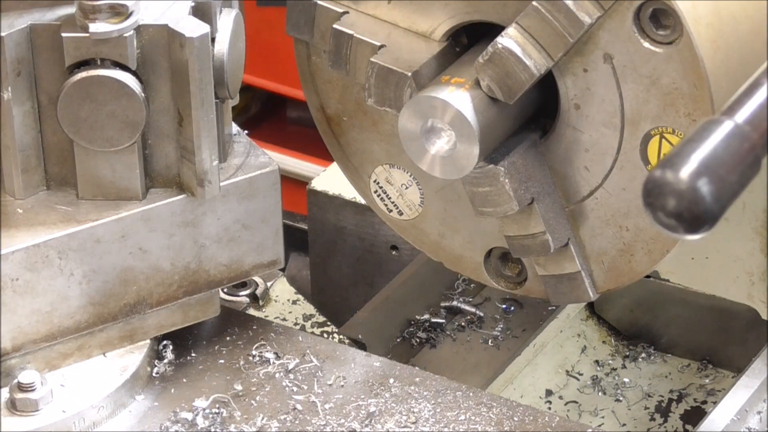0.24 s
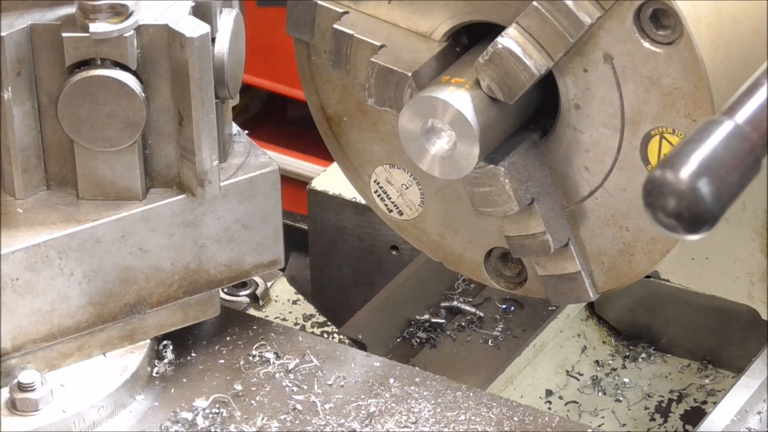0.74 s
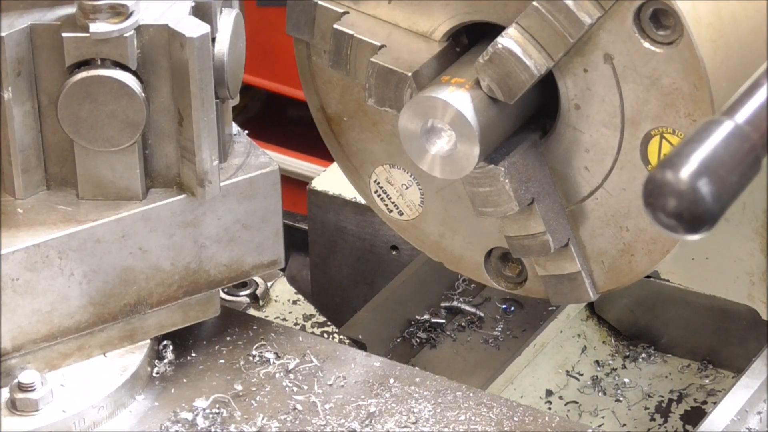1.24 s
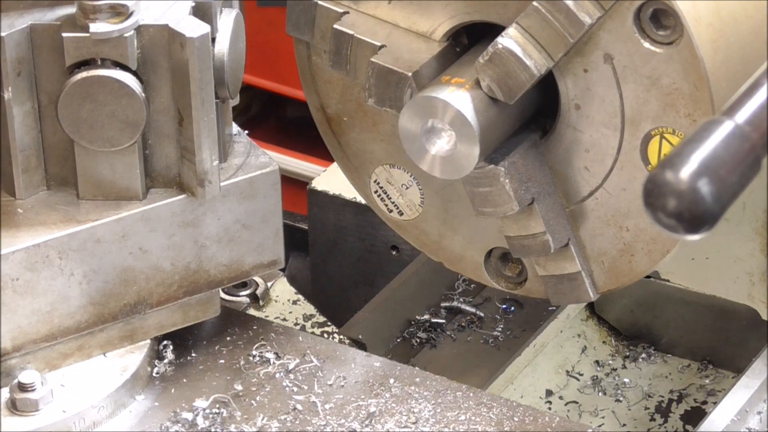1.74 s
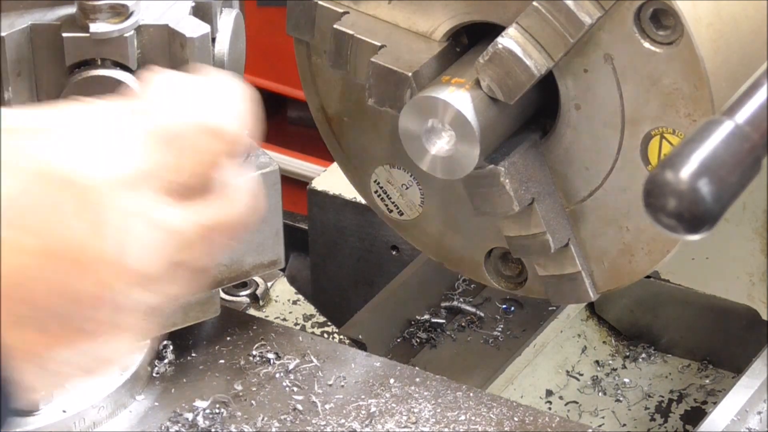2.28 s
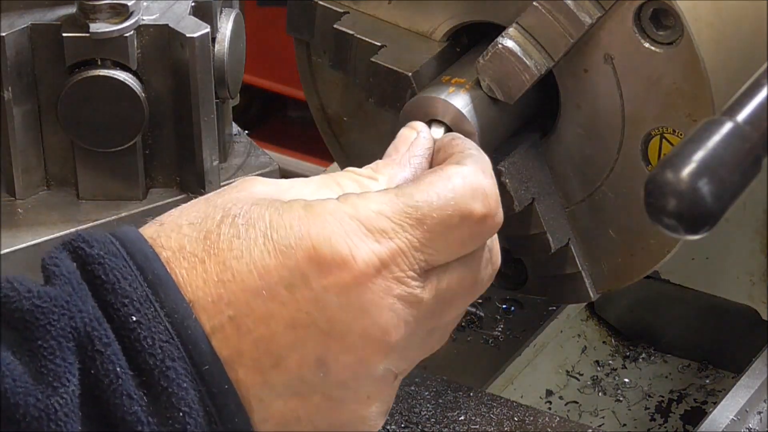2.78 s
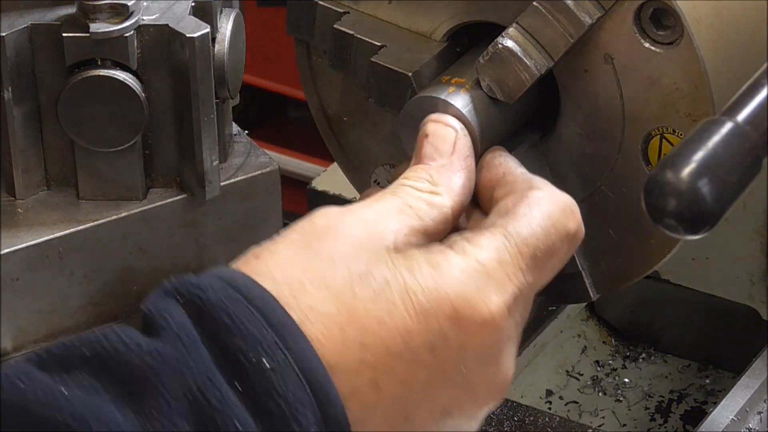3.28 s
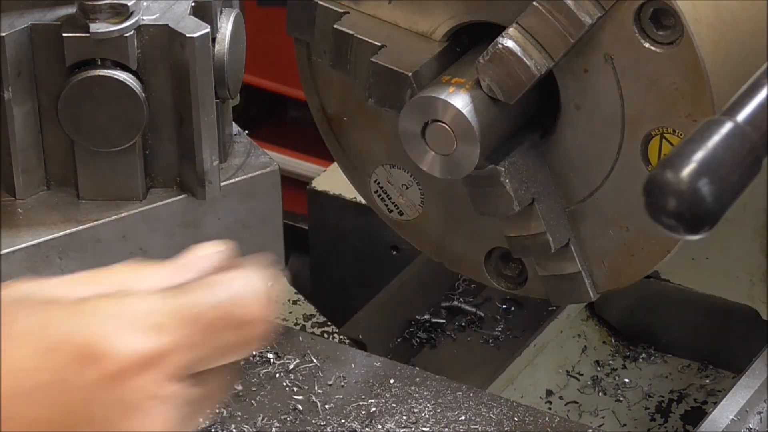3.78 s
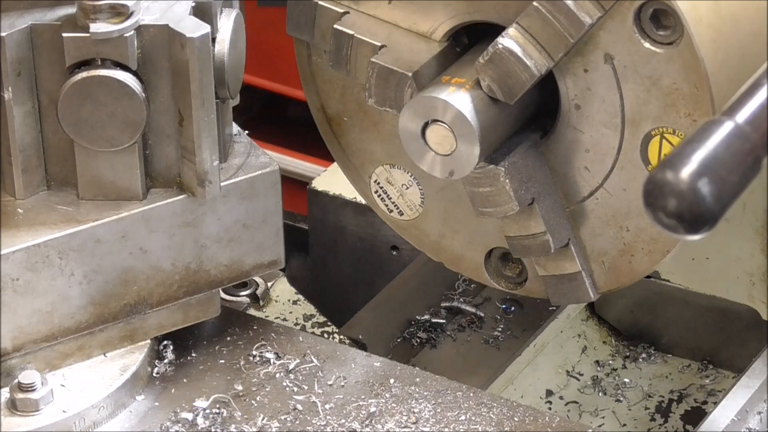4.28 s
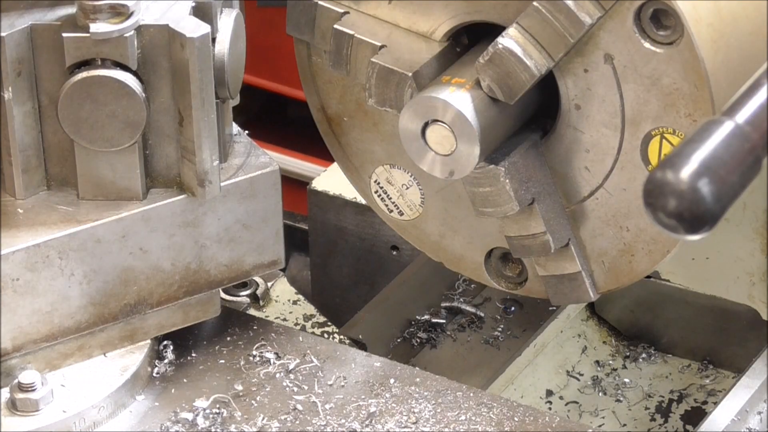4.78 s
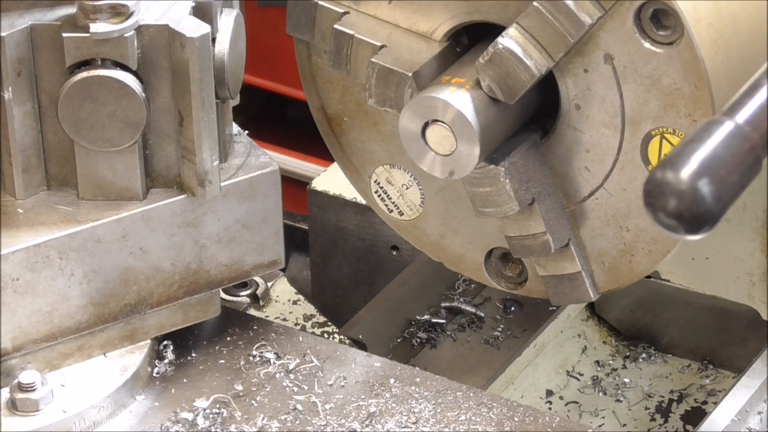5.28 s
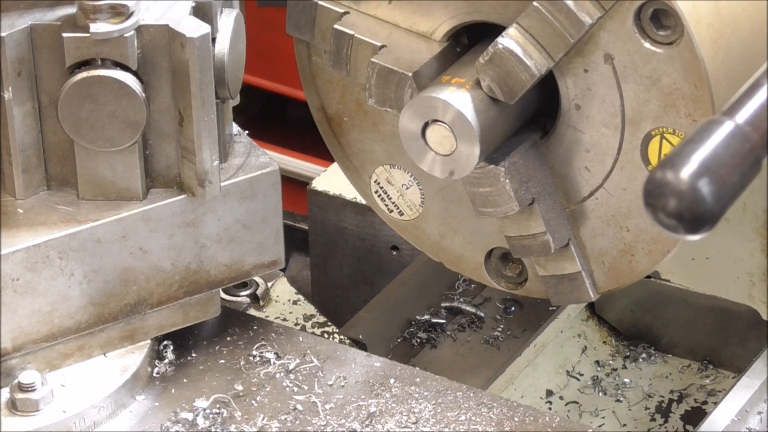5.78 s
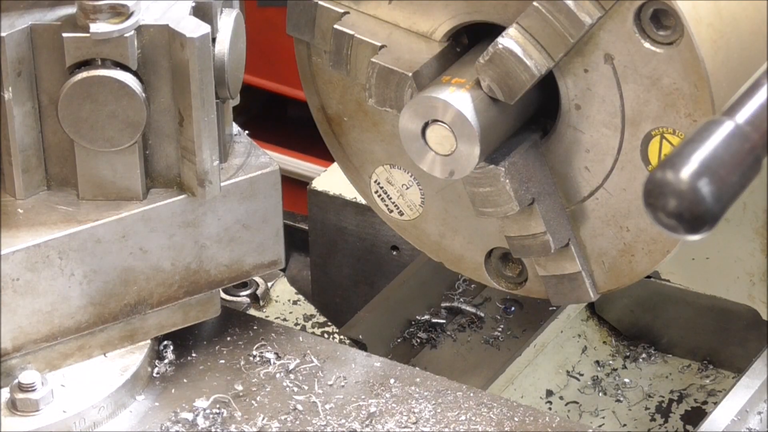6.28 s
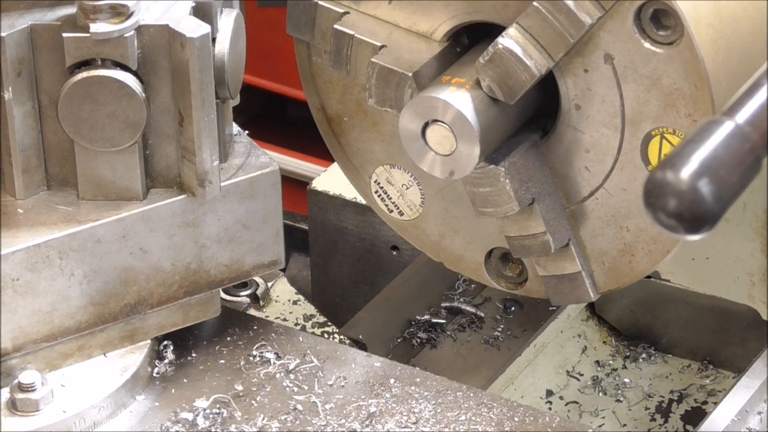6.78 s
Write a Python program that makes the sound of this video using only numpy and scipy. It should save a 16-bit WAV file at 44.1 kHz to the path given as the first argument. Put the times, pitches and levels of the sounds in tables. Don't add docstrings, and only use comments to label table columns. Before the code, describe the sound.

Idling machine hums at a low mains pitch in a small workshop, with a short steel clatter near the start and one tiny sharp click midway.

```python
import sys
import numpy as np
from scipy import signal
from scipy.fft import rfft, irfft, next_fast_len
from scipy.io import wavfile
from scipy.ndimage import uniform_filter1d

SR = 44100
rng = np.random.default_rng(int(sys.argv[2]) if len(sys.argv) > 2 else 0)


def pcm_store(signal):
    levels = np.round(np.clip(np.atleast_2d(signal), -1, 1) * 32767)
    wavfile.write(sys.argv[1], SR, levels.astype(np.int16).T)


def linear_from_db(decibels):
    return 10 ** (np.asarray(decibels, float) / 20)


N = 310023

# time in seconds, mains frequency in Hz.
MAINS = [(0, 49.8915), (0.7, 49.9001), (1.5, 49.9062), (2.5, 49.9096), (4.0, 49.9093), (5.5, 49.9083),
         (7.03, 49.9129)]
FAN_HZ = 154.239
LEAN_DB, SCATTER_PAN_DB = -4, 7
SIDE = np.array([[.5], [-.5]])


def evened(x):
    return x / np.sqrt(np.mean(x ** 2) + 1e-20)


def read(points, hz):
    f, value = np.transpose(points)
    return np.interp(np.log(hz + 1), np.log(f + 1), value)


def add(mix, s, sound):
    part = mix[..., round(s * SR):][..., :sound.shape[-1]]
    part += sound[..., :part.shape[-1]]


def band_noise(noise, f, width):
    hz = np.fft.rfftfreq(len(noise), 1 / SR)
    return irfft(rfft(noise) / (1 + (2 * (hz - f) / width) ** 4), len(noise))


def tone(angle, db, pan_db, lead, waver_db, drift_db=0):
    at = np.linspace(-.5, .5, N // 64 + 1)
    wander_db = waver_db * np.interp(at, np.linspace(-.5, .5, 40), rng.standard_normal(40))
    level_db = db + wander_db + drift_db * at * N / SR
    level = np.repeat(linear_from_db(level_db).astype(np.float32), 64)[:N]
    gain = linear_from_db(SIDE * np.clip(pan_db, -14, 14))
    gain = gain / abs(np.mean(gain * np.exp(1j * SIDE * lead)))
    wrapped = (angle - 2 * np.pi * np.rint(angle / (2 * np.pi))).astype(np.float32)
    wave = np.cos(wrapped + (SIDE * lead).astype(np.float32))
    return (np.sqrt(2) * gain).astype(np.float32) * level * wave


def filled(rows, orders, step_hz, points, scatter_db):
    k = np.setdiff1d(orders, [row[0] for row in rows])
    luck, pan = rng.standard_normal((len(k), 2)).T
    db = read(points, k * step_hz) + scatter_db * np.clip(luck, -3, 1.3)
    return np.transpose([k, db, LEAN_DB + SCATTER_PAN_DB * pan])


def buzz(angle, rows, waver):
    k, db, pan_db = np.transpose(rows)
    lead, a, b = rng.standard_normal((len(k), 3)).T
    size = 2 ** 14
    gain = linear_from_db(SIDE * pan_db) * np.exp(1j * SIDE * (0.7 * lead - .5))
    phase = np.exp(2j * np.pi * rng.random(len(k)))
    lines = linear_from_db(db) * gain / abs(gain.mean(0)) * phase * size / np.sqrt(2)
    bins = np.zeros((2, 2, size // 2 + 1), complex)
    bins[:, :, k.astype(int)] = [lines, waver * a * lines]
    cycle = irfft(bins, size)
    at = angle / (2 * np.pi) % 1 * size
    slow = np.interp(np.arange(N), np.linspace(0, N, 40), rng.standard_normal(40))
    steady, wander = [[np.interp(at, np.arange(size + 1), np.append(c, c[0])) for c in pair]
                      for pair in cycle]
    return np.array(steady) + slow * np.array(wander)


def motor():
    # multiple of mains, level in dB rms, left-right difference in dB,
    # left lead in radians, drift in dB per second.
    core = [(4, -49.4, -0.0, -0.0, -0.02), (8, -67.1, -0.4, 0.07, -0.09), (12, -73.7, 0.3, -0.47, 1.04),
            (16, -67.6, 3.7, -0.1, 0.11), (20, -63.5, -1.8, 0.0, -0.42), (24, -74.8, -0.7, 0.37, 0.2),
            (28, -73.0, -4.3, 0.08, -0.61), (32, -83.7, -16.9, 0.61, 0.87), (36, -75.8, -1.1, 0.3, -0.22),
            (40, -79.4, -0.5, 0.05, 0.7), (44, -80.3, -4.3, -1.3, 0.54), (48, -88.1, 6.6, -0.05, 0.42),
            (52, -88.1, 4.6, -0.68, -0.38), (56, -88.5, -0.4, -0.36, 1.05)]
    # multiple of mains, level in dB rms, left-right in dB, left lead in radians.
    windings = [(5, -85.7, 0, 0), (11, -90.6, 0.7, -0.05), (14, -89.1, -1.9, -0.26), (19, -86, -1.5, -0.02),
                (21, -89.6, -2.7, 0.16), (23, -89.4, -3.2, -0.13), (27, -90.3, 4.6, -0.53),
                (29, -83, -3.1, -0.17), (31, -86.2, 0.9, 0.09), (33, -84.6, -3.6, -0.05)]
    # multiple, level in dB rms,
    # left-right in dB, left lead in radians, time in step with the core in seconds.
    slots = [(20, -77.7, -2.2, 0.14, 0.071), (28, -77.0, -1.1, -0.19, 0.597),
             (32, -72.3, -3.2, 0.79, 1.091), (36, -75.0, -6.7, -0.13, 0.039),
             (40, -73.9, -5.1, -0.02, 0.168), (56, -83.2, 0.3, 0.07, 0.861)]
    # multiple, level in dB rms,
    # left-right in dB, drift in dB per second, time in step in seconds.
    sidebands = [(23, -87.8, -2.5, 0, 1.062), (30, -87.4, -6.7, 0, 1.277), (31, -84.5, 0.9, -1.5, 0.952),
                 (33, -80.3, -3.3, .8, 0.975), (34, -88.9, -1.4, 0, 1.035), (35, -84, -0.3, 3, 1.149),
                 (38, -86.7, -1.9, -.8, 0.854)]
    # multiple, level in dB rms, time in step in seconds.
    two_slips = [(52, -92, 0.455), (56, -88.3, 0.178), (60, -94.7, 0.187)]
    # multiple of mains, level in dB rms, left-right in dB.
    cover = [(60, -92.3, -1.8), (64, -93.6, 1), (68, -98, 1.7), (72, -95.7, -4.2), (76, -91.9, -8.8),
             (84, -85.8, -2.1), (92, -94.1, -5.4), (96, -98.7, -5.2), (100, -92.3, -1.7),
             (104, -97.8, -8.8), (108, -98.7, 0.9), (128, -99.5, -0.7), (136, -97.7, -2.6),
             (176, -97.6, -2.7)]
    # frequency in Hz, level in dB rms.
    laminations = [(4000, -102), (6000, -105), (7600, -103), (9500, -108), (12000, -111), (14000, -106),
                   (15500, -104)]
    # frequency in Hz, level in dB rms.
    odd_envelope = [(450, -89.5), (1250, -87.5), (1750, -92.5), (2000, -101), (2400, -100), (2750, -93)]

    t = np.arange(N) / SR
    mains = 2 * np.pi * np.cumsum(np.interp(t, *np.transpose(MAINS))) / SR
    slip = 2 * np.pi * .764
    side_lead = -.25
    start = 1.04 + .031 * np.arange(61) ** 2
    out = np.zeros((2, N))
    for k, db, pan_db, lead, drift_db in core:
        out += tone(k * mains + start[k], db, pan_db, lead, 0.014 * k, drift_db)
    for k, db, pan_db, lead in windings:
        out += tone(k * mains + start[k], db, pan_db, lead, 2.8)
    for k, db, pan_db, lead, s in slots:
        out += tone(k * mains + start[k] - slip * (t - s), db, pan_db, lead, 0.89)
    for k, db, pan_db, drift_db, s in sidebands:
        out += tone(k * mains + start[k] - slip * (t - s), db, pan_db, side_lead, 0.95, drift_db)
    for k, db, s in two_slips:
        out += tone(k * mains + start[k] - 2 * slip * (t - s), db, LEAN_DB, side_lead, 0.95)
    odd_rows = filled(windings, np.arange(9, 56, 2), MAINS[0][1], odd_envelope, 1.9)
    lamination_rows = filled(cover, np.arange(60, 313, 4), MAINS[0][1], laminations, 5.4)
    return out + buzz(mains, np.vstack([cover, odd_rows, lamination_rows]), .13)


def spinning_parts():
    # frequency in Hz, level in dB rms, left-right in dB, left lead in radians.
    shaft = [(266.2, -77.9, 0, 0), (465.8, -89, -2.6, -0.09), (498.84, -74.7, -1.2, 0.01),
             (532.36, -84.8, -1.6, -0.23), (2467.8, -97.7, 0, -0.06), (2743.54, -101.1, -1.2, -0.05),
             (2893.6, -97.7, 3.6, -0.04), (2993.04, -95, -1.9, -0.34), (5207.96, -102.6, -1, -0.06),
             (5362.2, -106.8, -0.3, -0.04), (7183.14, -107.5, -1.4, -0.12), (8438.06, -106.7, -8.4, -0.07)]
    # multiple of the blade rate, level in dB rms, left-right in dB.
    fan = [(32, -100.2, -1), (35, -99.7, -4.9), (37, -91.5, -1.5), (38, -98.8, 2.5), (47, -100.8, 1.5)]
    # frequency in Hz, level in dB rms.
    fan_rest = [(4700, -105), (6100, -108), (7000, -103), (9000, -109)]

    turn = 2 * np.pi * np.arange(N) / SR
    out = np.zeros((2, N))
    for hz, db, pan_db, lead in shaft:
        out += tone(hz * turn + rng.uniform(0, 2 * np.pi), db, pan_db, lead, 1.0)
    rest = filled(fan, np.arange(31, 59), FAN_HZ, fan_rest, 1.7)
    return out + buzz(FAN_HZ * turn, np.vstack([fan, rest]), 0.17)


def faint_comb(step_hz, points, scatter_db):
    hz = step_hz * np.arange(np.ceil(points[0][0] / step_hz), points[-1][0] // step_hz)
    luck, pan, turn, lead = rng.standard_normal((len(hz), 4)).T
    db = read(points, hz) + scatter_db * np.clip(luck, -3, 1.5) + 3.3 * SIDE * pan
    lines = linear_from_db(db) * np.exp(1j * (9 * turn + 0.43 * SIDE * lead))
    lines = lines * (np.round(hz / step_hz) % 4 > 0)
    bins = np.zeros((2, N // 2 + 1), complex)
    bins[:, np.round(hz * N / SR).astype(int)] = lines * N / np.sqrt(2)
    return irfft(bins, N)


def faint_lines():
    # frequency in Hz, level in dB rms.
    faint_mains = [(2200, -103), (3000, -106), (3500, -112), (5000, -114), (9000, -118), (15500, -120)]
    # frequency in Hz, level in dB rms.
    faint_fan = [(4300, -124), (5400, -115), (6400, -114), (7600, -118), (8800, -115), (9600, -124)]

    shaft_hz = FAN_HZ / 8
    return faint_comb(np.mean(MAINS, 0)[1], faint_mains, 7.9) + faint_comb(shaft_hz, faint_fan, 9.6)


def air_and_hiss():
    # frequency in Hz, level in dB per Hz.
    rush_envelope = [(30, -111), (110, -108), (200, -100), (320, -104), (450, -100), (600, -102),
                     (900, -104), (1700, -104), (2400, -107), (3400, -123), (4500, -124), (9000, -126),
                     (10500, -130), (15500, -125)]
    # frequency in Hz, width in Hz, lift in dB, left-right in dB.
    casing = [(725, 102, 4, -4.5), (1051, 132, 5, -1), (1390, 330, 6.5, -5), (1890, 200, 6, 1),
              (2180, 80, 5.5, -3), (2960, 480, 6, -3), (3974, 320, 9, -6), (9040, 900, 4, -0.5),
              (10500, 530, 4, 2.5), (13750, 570, 1, 0)]
    # frequency in Hz, likeness from 0 to 1.
    likeness = [(100, 0.8), (230, 1), (330, 1), (400, 0.96), (1000, 0.93), (2000, 0.69), (3000, 0.7),
                (5000, 1), (10000, 0.3), (15000, .4)]
    # frequency in Hz, level in dB per Hz.
    hiss_envelope = [(20, -110), (100, -111), (200, -113), (240, -135), (1000, -130), (8000, -130),
                     (16000, -128)]

    size = next_fast_len(N)
    hz = np.fft.rfftfreq(size, 1 / SR)
    left, other, hiss_left, hiss_right = rfft(rng.standard_normal((4, size)))
    same = np.clip(read(likeness, hz), 0, 1)
    rush = np.array([left, same * left + np.sqrt(1 - same ** 2) * other])
    lift_db = sum((db + SIDE * pan_db) / (1 + (2 * (hz - f) / w) ** 4) for f, w, db, pan_db in casing)
    hiss = np.array([hiss_left, hiss_right]) * linear_from_db(read(hiss_envelope, hz))
    total = rush * linear_from_db(read(rush_envelope, hz) + lift_db) + hiss
    return irfft(total, size)[:, :N] * np.sqrt(SR / 2)


def ring(modes):
    t = np.arange(6000) / SR
    luck = rng.standard_normal((len(modes), 2))
    return sum(linear_from_db(db + 1.5 * a - 60 * t / t60) * np.sin(2 * np.pi * hz * (1 + .004 * b) * t)
               for (hz, db, t60), (a, b) in zip(modes, luck)) / 2


def clatter():
    # start in seconds, peak level in dB, centre in Hz.
    scraping = [(.333, -49.5, 2700), (0.334, -52.5, 7500), (.341, -47, 2100), (.3808, -58, 7500),
                (.384, -50.5, 2450), (.385, -56.5, 600), (.390, -62, 9000), (.402, -61, 8000),
                (0.4084, -58, 8000), (.409, -51.5, 2000), (.425, -62, 2070), (.44, -59, 1480),
                (.546, -60, 800)]
    # start in seconds, peak level in dB, centre in Hz.
    knocking = [
        (.1844, -59.5, 1800),
        (.1846, -61, 810),
        (.361, -60, 2500),
        (0.3813, -49.5, 1610),
        (.401, -50.5, 1700),
        (.415, -49, 1166),
        (.610, -60, 1150),
    ]
    # start in seconds, level in dB.
    blows = [
        (.3335, -49),
        (.3811, -52),
        (.4086, -59),
    ]
    # frequency in Hz, level in dB, decay time T60 in seconds.
    steel = [(2730, 6.5, 0.03), (3980, -5, 0.036), (4660, -19, .03), (6140, 1.5, 0.053), (8500, -9, .025),
             (9700, -6, .035), (11230, -1.5, 0.043), (14280, -11, .025)]

    out, t = np.zeros(N), np.arange(6000) / SR
    scrapes = [(s, db, f, 1.05 * f, 0.13 * (2000 / f) ** .4) for s, db, f in scraping]
    knocks = [(s, db, f, 460, 0.14) for s, db, f in knocking]
    for s, db, f, width, t60 in scrapes + knocks:
        noise, lumps = rng.standard_normal((2, len(t)))
        contacts = noise * np.exp(.45 * evened(uniform_filter1d(lumps, 60)))
        band = band_noise(contacts, f, width)
        start = np.std(band[:300])
        add(out, s, band / start * linear_from_db(db - 60 * t / t60) * np.minimum(t / 0.00031, 1))
    for s, db in blows:
        add(out, s, linear_from_db(db) * ring(steel))
    return out * linear_from_db(np.array([[-.7], [.7]]))


def room(x):
    t60 = .09
    taps = np.zeros((2, SR // 2))
    at = np.arange(100, SR // 2 - 20, 20)
    at = at + rng.integers(0, 20, (2, len(at)))
    np.put_along_axis(taps, at, rng.choice([-1., 1.], at.shape), 1)
    taps *= linear_from_db(-60 * np.arange(SR // 2) / SR / t60)
    return signal.fftconvolve(x, taps / np.linalg.norm(taps[0]), axes=1)[:, :N]


def hand():
    # start in seconds, peak level in dB, centre in Hz, width in Hz, T60 in seconds.
    ticks = [(1.541, -63, 10000, 11000, .03), (1.542, -74, 6300, 900, .025), (1.62, -59, 450, 400, .08),
             (1.615, -75, 9000, 12000, .08), (2.4978, -64, 13000, 6000, .012),
             (2.7458, -59, 12000, 8000, .013), (2.9458, -68, 12500, 5000, .012),
             (2.9524, -67, 12300, 1500, .012), (3.4063, -67, 14000, 6000, .025),
             (5.68, -75, 13000, 6000, .04), (6.58, -78, 14000, 4000, .06)]
    # start in seconds, peak level in dB, centre in Hz, width in Hz,
    # T60 in seconds.
    disc = [
        (3.018, -58, 10100, 2500, .015),
        (3.0196, -53, 12900, 4500, .025),
        (3.021, -67, 7340, 900, .03),
        (3.024, -70, 4530, 5000, .1),
    ]
    # start in seconds, end in seconds, frequency in Hz, level in dB rms.
    squeak_row = (4.951, 4.993, 11700, -80)

    out, t = np.zeros((2, N)), np.arange(4000) / SR
    puffs = [(*row, 0) for row in ticks] + [(*row, 3.5) for row in disc]
    for s, db, f, width, t60, pan_db in puffs:
        band = band_noise(rng.standard_normal(len(t)), f, width)
        puff = evened(band) * linear_from_db(db - 60 * t / t60) * np.minimum(t / 0.0011, 1)
        add(out, s, puff * linear_from_db(SIDE * pan_db))
    start, end, f, db = squeak_row
    t = np.arange(round((end - start) * SR)) / SR
    pitch = f * (1 - .04 * np.exp(-t / 0.0018))
    chatter = 1 + 0.32 * evened(uniform_filter1d(rng.standard_normal(len(t)), 90))
    squeak = np.sin(2 * np.pi * np.cumsum(pitch) / SR) * chatter * linear_from_db(db + 3 - 8 * t / (end - start))
    add(out, start, squeak * signal.windows.tukey(len(t), .2) * np.ones((2, 1)))
    return out


def scene():
    machine = motor() + spinning_parts() + faint_lines()
    no_bass = signal.butter(2, 250, "high", fs=SR, output="sos")
    close = signal.sosfilt(no_bass, clatter() + hand())
    return machine + air_and_hiss() + close + linear_from_db(-6) * room(close)


def roll_off(x):
    return signal.sosfilt(signal.butter(12, 15830, fs=SR, output="sos"), x)


def record(dry):
    # start in seconds, pull-down in dB.
    dips = [
        (0.333, 7),
        (.383, 4.5),
        (0.413, 6),
        (.443, 7),
        (.485, 1),
        (.53, -1),
        (3.021, 9.5),
    ]
    grab_s, release_s = 0.005, 0.051

    t = np.arange(N) / SR
    pull_db = np.max([db * np.clip((t - s) / grab_s, 0, 1) * np.exp(-np.maximum(t - s, 0) / release_s)
                      for s, db in dips], axis=0)
    edge = signal.firwin(511, 15750, window=("kaiser", 9), fs=SR)
    mix = signal.oaconvolve(dry * linear_from_db(-pull_db), edge[None], "same")
    return roll_off(mix)


dry = scene()
out = record(dry)
pcm_store(out)
```